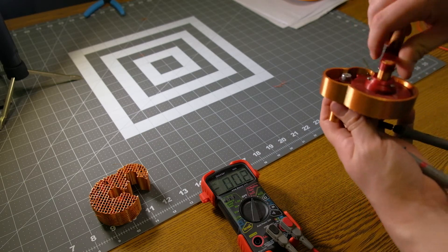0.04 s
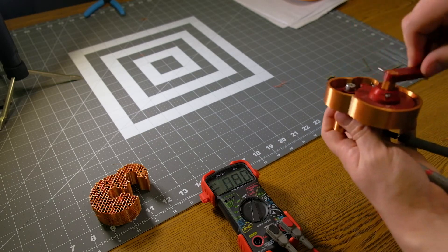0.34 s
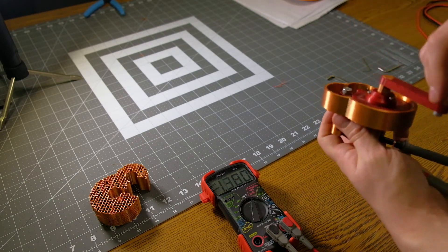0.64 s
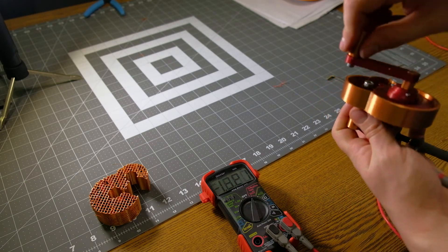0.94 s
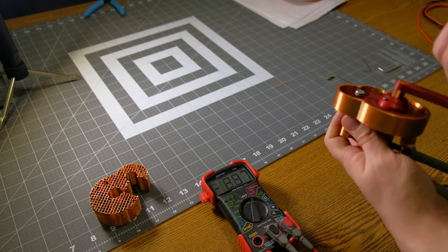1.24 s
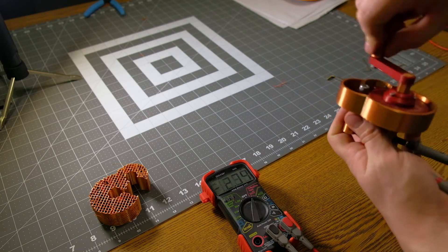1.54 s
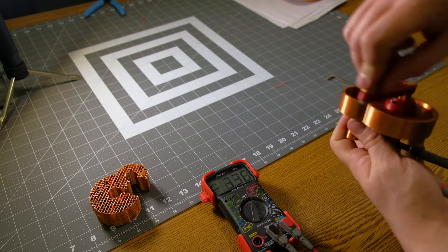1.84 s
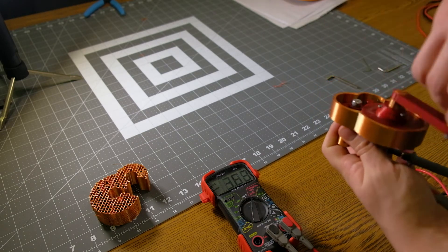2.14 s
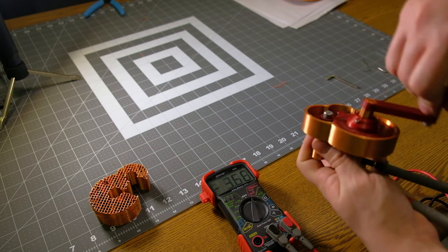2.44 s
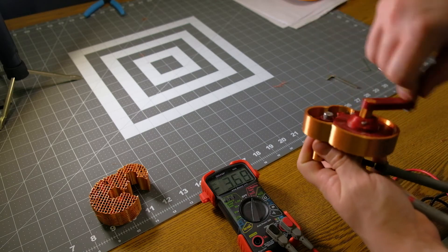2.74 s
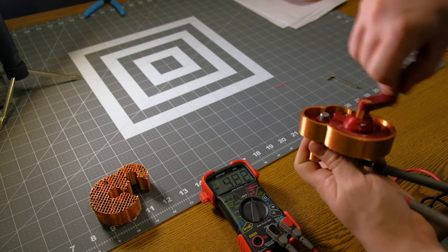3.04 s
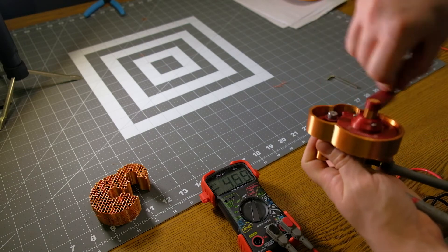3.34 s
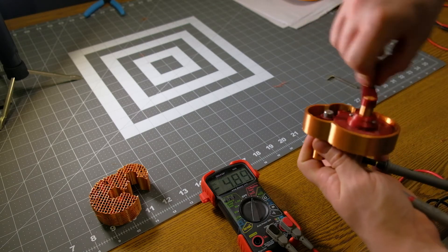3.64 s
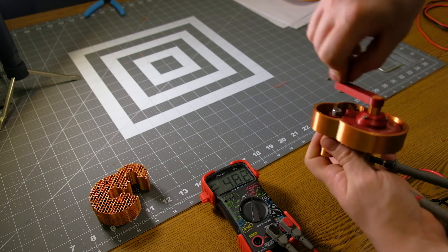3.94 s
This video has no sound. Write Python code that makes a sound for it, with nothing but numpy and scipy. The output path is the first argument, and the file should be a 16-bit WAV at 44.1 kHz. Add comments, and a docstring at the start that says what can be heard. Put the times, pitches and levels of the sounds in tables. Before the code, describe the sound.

Loose gears rattle and whir in the metal case of a hand-cranked generator. They stir, pause, then pick up speed and grow brighter, with irregular knocks and gritty clicks, close to the microphone in a quiet small room.

```python
"""A small hand-cranked generator above a workbench, close to a stereo microphone and a little to the right.
A nudge, a slow start, then steady turning: loose gear teeth clatter in the metal housing, swelling with
each push and growing brighter with speed. Backlash knocks, gritty ticks and brief groans of binding
gears stand out over the whirr of the case and a faint rotor drone.
Behind it a small room answers, with soft air and a low hum."""
import sys
import numpy as np
from scipy import signal
from scipy.fft import rfft, irfft
from scipy.io import wavfile

SR = 44100
rng = np.random.default_rng(int(sys.argv[2]) if len(sys.argv) > 2 else 0)


def master(y):
    """Save y as 16-bit WAV."""
    cut = np.clip(np.atleast_2d(y).T, -1, 1)
    pcm = np.round(cut * 32767)  # scale
    wavfile.write(sys.argv[1], SR, pcm.astype(np.int16))


N = 176400

# Push on the crank, heard as gear noise: t/s, relative level/dB
PUSH = [(0, -27.5), (.02, -46), (.07, -38.5), (.11, -59), (.27, -82), (.3, -43.5), (.337, -24),
        (.38, -31.5), (.44, -47), (.495, -49), (.505, -41), (.59, -29), (.66, -35), (.79, -33.5),
        (.89, -23), (.98, -29.5), (1.0, -25), (1.15, -26.5), (1.18, -22.5), (1.25, -25.5), (1.44, -22),
        (1.54, -23.5), (1.61, -20.5), (1.64, -25), (1.7, -30.5), (1.73, -30.5), (1.77, -24.5),
        (1.83, -23.5), (1.92, -25.5), (1.99, -21.5), (2.06, -22), (2.09, -28.5), (2.17, -24.5), (2.25, -23),
        (2.34, -21.5), (2.38, -24.5), (2.43, -24), (2.47, -27.5), (2.555, -27.5), (2.58, -22), (2.68, -23),
        (2.73, -21.5), (2.79, -25), (2.88, -26), (2.9, -24.5), (2.99, -21), (3.04, -27), (3.075, -21),
        (3.1, -25), (3.15, -30), (3.19, -27), (3.215, -21.5), (3.3, -24), (3.42, -23.5), (3.465, -29),
        (3.54, -22), (3.61, -21.5), (3.65, -25.5), (3.7, -21.5), (3.76, -25), (3.785, -29.5), (3.82, -30),
        (3.835, -20.5), (3.89, -24.5), (4.0, -22.5)]
# Crank speed: t/s, share of full speed
CRANK_SPEED = [(0, 0.38), (.35, 0.41), (.5, .15), (.78, .25), (.9, 0.46), (1.2, .6), (1.9, .8),
               (2.65, 1.009), (4, 1.013)]
# Rise and fall of the gritty treble: t/s, relative level/dB
GRIT_LEVEL = [(0, 3), (.33, -20), (.59, -7), (.75, -4), (.87, 2), (1.02, -2), (1.42, 1), (1.9, 3.5),
              (2.5, 1), (3.3, 0), (4, -0.5)]
# Single blows, each list: t/s, relative level/dB
KNOCK_HITS = [(.296, -17), (.50, -31), (1.260, -6.5), (1.270, -4), (1.611, -7), (1.720, -4.5), (1.839, -4),
              (1.941, 3), (2.129, 1), (2.333, 1.5), (2.351, -2.5), (2.399, 0.5), (2.411, 3.5), (2.432, 0),
              (2.486, -2.5), (2.640, 2), (2.738, -1), (2.906, -2), (2.978, -6), (3.062, 1), (3.076, -6),
              (3.120, -2.5), (3.214, -2), (3.736, 1), (3.846, -6)]  # backlash in the gears
SNAP_HITS = [(.583, -10), (1.260, -10), (1.611, -1.5), (1.720, -0.5), (1.837, 5), (2.124, -1.5),
             (2.486, -2.5), (2.737, 3), (2.906, -0.5), (3.047, -2), (3.358, 4), (3.672, 0), (3.795, -1.5),
             (3.946, 0.5)]  # teeth slip, bright and metallic
CATCH_HITS = [(.296, -16), (.356, -11), (.570, -17), (.587, -5), (.602, -12), (.612, -7), (.707, -16),
              (.830, -4.5), (.865, -6), (.911, -11), (1.004, -10), (1.128, -2.5), (1.259, -1), (1.385, -3),
              (1.512, 1), (1.719, -3), (1.839, 2.5), (2.035, -4), (2.412, -1), (2.432, -1), (2.907, 6.5),
              (3.358, 1)]  # teeth take up their play with a sharp tick
BUMP_HITS = [(.824, -2.5), (1.267, -1), (2.605, -3), (2.805, -11), (3.064, -15), (3.277, -4), (3.425, -1.5),
             (3.597, -7), (3.737, -2), (3.928, -3)]  # hollow bumps of the handle
GROAN_HITS = [(.338, -7), (1.186, 3), (2.345, 1), (2.742, 3), (3.077, 3), (3.428, -2), (3.700, 3.5)]  # gears bind under load
# Spectra of the generator's sounds, each: f/Hz, relative level/dB
GRIND_TONE = [(40, -40), (200, -49.5), (400, -22.5), (650, -14.5), (810, -14.5), (950, -18), (1080, -15.5),
              (1220, -14.5), (1500, -5), (1750, -1.5), (2000, 0.5), (2300, 0.93), (2850, -1), (3300, -12.5),
              (3900, -17), (4400, -26.5), (4900, -17), (6000, -37.5), (9000, -37), (16000, -47.5)]  # fast teeth through the housing
CLATTER_TONE = [(100, -47), (700, -15.5), (1200, -20), (1700, 0.5), (2300, 3.5), (3250, -7.5), (3650, 2.5),
                (4400, -0.5), (4850, -2), (5450, -3.5), (5950, -13), (6650, -11), (7100, -16.5),
                (10000, -27.5), (11500, -50), (16000, -60)]
GRIT_TONE = [(100, -22), (1500, 5), (4500, 6.5), (6000, -1.5), (8000, -3), (9800, -7), (11300, -3),
             (12600, -16.5), (15500, -48)]
KNOCK_TONE = [(100, -68), (750, -18), (1200, -27), (1650, -7), (2150, 0.5), (3200, -5), (4200, -10),
              (5400, -10.5), (7000, -35.5), (11000, -36), (16000, -56)]
SNAP_TONE = [(100, -54), (1500, -9), (2400, 13), (3200, -22), (3800, 4.5), (5200, 2.5), (6000, -17),
             (6800, -8), (8000, -26), (16000, -35)]
CATCH_TONE = [(100, -5), (1500, -6), (4500, 11), (6000, -1.5), (8000, 1), (9800, -9.5), (11200, -5),
              (12600, -19), (15500, -27)]
BUMP_TONE = [(50, -29), (250, -20), (520, -0.5), (800, 3.5), (1000, -4), (1500, -23), (8000, -70)]
GROAN_TONE = [(300, -48), (1250, -19), (1550, -3), (1780, 3.5), (2000, -17), (3000, -33), (8000, -63)]
WHIRR_TONE = [(100, -40), (500, -18.5), (660, -3), (740, -6), (810, -1.5), (900, -19), (1500, -36.5),
              (8000, -68)]
# Ringing modes of the housing: f/Hz, relative level/dB, t60/s
CASE_MODES = [(810, -12.5, 0.084), (1082, 3, 0.1), (1680, -11, 0.18), (1836, -3.5, 0.07), (2070, -14, 0.16),
              (2255, -7.5, 0.21), (2320, -10.5, 0.011), (2303, -8, 0.16), (2370, -6.5, 0.084),
              (2550, -6, 0.067), (2750, -18, 0.11), (3600, -1, 0.12), (4000, -0.5, 0.11), (4080, -1, 0.11),
              (4644, -4.5, 0.077), (5010, 0, 0.075)]
# Drone of the rotor spinning up: t/s, f/Hz, level/dB
ROTOR_DRONE = [(.85, 196, -66), (1.03, 206.7, -49.5), (1.28, 218, -70), (1.549, 258.7, -50),
               (1.75, 266, -85)]
# Right minus left at the microphone: f/Hz, level/dB
RIGHT_BIAS = [(100, -7), (500, 1), (1300, -0.6), (2300, 2.5), (3300, 1.5), (4600, 2), (5500, 4.5),
              (6400, 3), (7200, 2.5), (12000, 3)]
# Decay of the small room: f/Hz, t60/s
ROOM_DECAY = [(200, 0.17), (2000, 0.1), (6000, 0.15), (14000, 0.1)]
# Spectrum of the room air: f/Hz, relative level/dB
AIR_TONE = [(25, -21), (60, -4.5), (130, -2.5), (220, 0), (420, 1.5), (700, -2.5), (1100, -3), (2000, -12),
            (3500, -21), (7000, -31), (15000, -42)]

TEETH_PER_S, CLATTER_PER_S, GRIT_PER_S, TURNS_PER_S = 1200, 700, 450, 1.7  # at full speed
CLATTER_RISE_DB, WHIRR_RISE_DB = 18.5, 26  # from rest to full speed


def gears(judder_hz=30):
    """Close up, the teeth give a dull grind, a hard clatter that grows with speed, and clumps of grit."""
    push = amp(curve(PUSH) + .4 * wobble(judder_hz))
    clusters = jumps()
    grind_force = push * unit(clusters ** .25)
    grind = contacts(grind_force * meshing(TEETH_PER_S), rattle_s=.008, chatter=.63, scatter=.57)
    clatter_force = push * amp(CLATTER_RISE_DB * (curve(CRANK_SPEED) - 1)) * clusters
    clatter = contacts(clatter_force * meshing(CLATTER_PER_S), rattle_s=.009, chatter=.67, scatter=.84)
    grit_force = push * amp(curve(GRIT_LEVEL) + 1.8 * wobble(judder_hz)) * clusters
    grit_clicks = grit_force * meshing(GRIT_PER_S, spread_db=4.5)
    grit = contacts(grit_clicks, rattle_s=.01, chatter=1, scatter=3.4)
    return (amp(-2) * colour(grind, GRIND_TONE)
            + amp(-4.5) * colour(clatter, CLATTER_TONE)
            + amp(-21.5) * colour(grit, GRIT_TONE))


def meshing(full_speed_per_s, spread_db=3.5, jitter=.35):
    """Teeth meet at a rate that follows the crank, each a little early or late, harder or softer."""
    rate = full_speed_per_s * (1 + curve(CRANK_SPEED)) / 2
    due = np.flatnonzero(np.diff(np.floor(np.cumsum(rate) / SR)))
    late, force = rng.standard_normal((len(due), 2)).T
    landed = (due + jitter * late * SR / rate[due]).astype(int) % N
    clicks = np.zeros(N)
    clicks[landed] = amp(spread_db * np.minimum(force, 2))
    return unit(clicks * rng.choice([-1, 1], N) / np.sqrt(rate))


def jumps(settle_s=.005):
    """Loose teeth jump and settle: the force leaps up and dies away, so ticks come in clusters."""
    kicks = abs(meshing(full_speed_per_s=70, spread_db=1.5))
    settling = signal.lfilter([1], [1, -np.exp(-1 / (settle_s * SR))], kicks)
    return unit(1 + amp(4) * unit(settling))


def contacts(clicks, rattle_s, chatter, scatter, points=14, size=1024):
    """Teeth strike contact points that move round with the crank, each with its own short rattle."""
    turns = np.cumsum(TURNS_PER_S * curve(CRANK_SPEED)) / SR
    struck = np.floor((turns + .13 * rng.standard_normal(N)) * points) % points
    t = np.arange(size) / SR
    out = np.zeros((2, N))
    for point in range(points):
        rattle = unit_energy(rng.standard_normal((3, size)) * amp(-60 * t / rattle_s))
        # Chatter is common to both channels; scatter differs left and right.
        response = (t == 0) + chatter * rattle[2] + scatter * rattle[:2]
        out += convolve(clicks * (struck == point), unit_energy(response))
    return out


def backlash():
    """Play in the gears and handle: compact knocks, bright snaps, fine ticks and hollow bumps."""
    return (amp(2) * colour(blows(KNOCK_HITS, scatter=.56), KNOCK_TONE)
            + amp(-.5) * colour(blows(SNAP_HITS, scatter=.7), SNAP_TONE)
            + amp(-8) * colour(blows(CATCH_HITS, scatter=3.2), CATCH_TONE)
            + amp(-7.5) * colour(blows(BUMP_HITS, scatter=.36, width_s=.004), BUMP_TONE))


def blows(hits, scatter, width_s=.0007, size=2048):
    """Parts collide in quick succession: one tight burst per hit, partly different in each channel."""
    t = (np.arange(size) - size // 2) / SR
    out = np.zeros((2, N))
    for time_s, db in hits:
        noise = rng.standard_normal((3, size)) * np.exp(-(t / width_s) ** 2 / 2)
        spectrum = rfft(noise[2] + scatter * noise[:2])
        flat_burst = irfft(spectrum / (abs(spectrum) + 1e-12), size)
        start = round(time_s * SR) - size // 2
        out[:, start:start + size] += amp(db) * flat_burst
    return out


def groans():
    """The gears bind for a moment and shake the lower resonances of the case."""
    return colour(blows(GROAN_HITS, scatter=.56, width_s=.007), GROAN_TONE)


def whirr():
    """The fast teeth set the hollow case humming, more firmly as the crank speeds up."""
    force = amp(curve(PUSH) + WHIRR_RISE_DB * (curve(CRANK_SPEED) - 1))
    return amp(-25) * colour(force * meshing(TEETH_PER_S), WHIRR_TONE)


def housing(x, size=8192):
    """The hand-damped metal case rings briefly with every blow."""
    t = np.arange(size) / SR
    ring = np.zeros(size)
    for hz, db, t60 in CASE_MODES:
        decay = amp(-60 * t / t60)
        ring += 2 * amp(db) * decay / decay.sum() * np.cos(2 * np.pi * hz * t)
    return x + convolve(x, ring)


def rotor():
    """A faint wavering tone, dead centre, climbs as the rotor gathers speed."""
    times, hz, db = np.transpose(ROTOR_DRONE)
    cycles = np.cumsum(curve(np.c_[times, hz])) / SR
    return amp(curve(np.c_[times, db])) * unit(np.sin(2 * np.pi * cycles + .43 * wobble(6)))


def off_centre(x, right_lead_s=.000045):
    """The generator is a little right of the microphone: earlier on that side, and louder in the treble."""
    hz = np.fft.rfftfreq(N, 1 / SR)
    side = np.array([[-.5], [.5]])
    gain = amp(side * at_hz(RIGHT_BIAS, hz))
    lead = np.exp(2j * np.pi * hz * side * right_lead_s)
    return irfft(rfft(x) * gain * lead, N)


def room(x, gap_s=.004, size=16384):
    """Near walls return sparse reflections, different in each channel; the bass lingers longest."""
    taps = rng.standard_normal((2, size)) * (rng.random((2, size)) < .08)
    taps *= np.arange(size) / SR > gap_s
    hz, t, bands = signal.stft(taps, SR, nperseg=256)
    decay = amp(-60 * t / at_hz(ROOM_DECAY, hz)[:, None])
    tail = signal.istft(bands * decay, SR, nperseg=256)[1]
    return convolve(x, unit_energy(tail))


def room_tone(hum_hz=91, correlation=.42):
    """Soft air and a low, slightly unsteady hum lie behind the bench, a touch to the left."""
    noise = rng.standard_normal((3, N))
    air = colour(np.sqrt(correlation) * noise[2] + np.sqrt(1 - correlation) * noise[:2], AIR_TONE)
    hum = unit(np.sin(2 * np.pi * hum_hz * np.arange(N) / SR + .2 * wobble(3.5)))
    return (amp(-48) * air + amp(-59.5) * hum) * amp([[.9], [-.9]])


def amp(db):
    """Decibels to gain."""
    return 10 ** (np.asarray(db) / 20)


def unit(x):
    """Scales to rms 1."""
    return x / np.sqrt(np.mean(x ** 2) + 1e-20)


def unit_energy(x):
    """Scales each channel to energy 1."""
    return x / np.linalg.norm(x, axis=-1, keepdims=True)


def curve(rows):
    """Reads a time table at every sample."""
    return np.interp(np.arange(N) / SR, *np.transpose(rows))


def at_hz(rows, hz):
    """Reads a table on a log-frequency axis."""
    f, value = np.transpose(rows)
    return np.interp(np.log(hz + 1), np.log(f + 1), value)


def convolve(x, response):
    """Convolution along time, cut to the scene."""
    return signal.fftconvolve(np.atleast_2d(x), np.atleast_2d(response), axes=1)[:, :N]


def colour(x, tone, size=4096):
    """Minimum-phase filter of unit energy with the given spectrum."""
    log_gain = np.log(amp(at_hz(tone, abs(np.fft.fftfreq(size, 1 / SR)))))
    spectrum = np.exp(np.conj(signal.hilbert(log_gain)))
    return convolve(x, unit_energy(np.fft.ifft(spectrum).real[:size // 2]))


def wobble(hz):
    """Random motion around a rate."""
    f = np.fft.rfftfreq(N, 1 / SR) / hz
    return unit(irfft(rfft(rng.standard_normal(N)) * f * np.exp(-f ** 2 / 2), N))


def scene():
    """The generator up front, the small room behind it."""
    generator = housing(gears() + whirr() + groans() + backlash())
    return off_centre(generator + amp(-7.5) * room(generator)) + rotor() + room_tone()


def record(dry):
    """The microphone chain cuts off the highest treble."""
    lowpass = signal.firwin(511, 15700, window=("kaiser", 9), fs=SR)
    return signal.oaconvolve(dry, lowpass[None], "same")


dry = scene()
out = record(dry)
master(out)
```